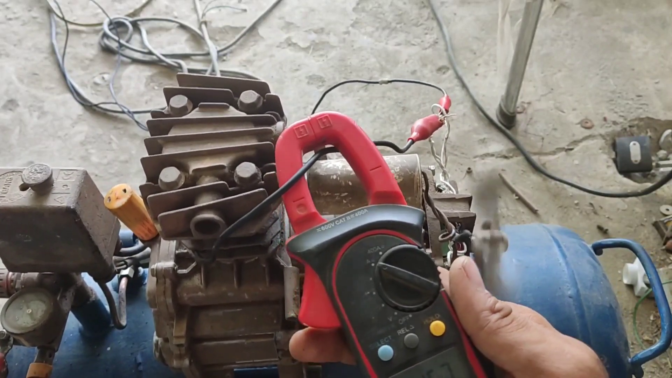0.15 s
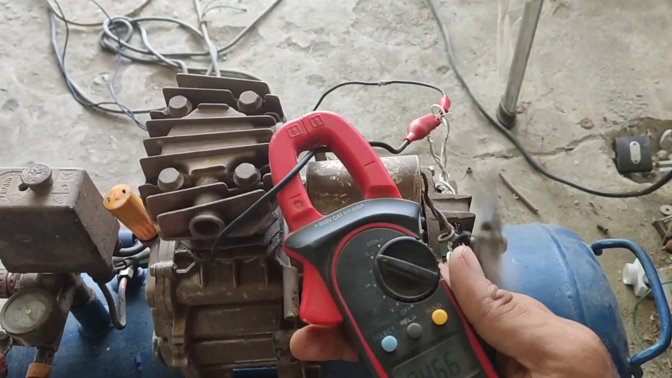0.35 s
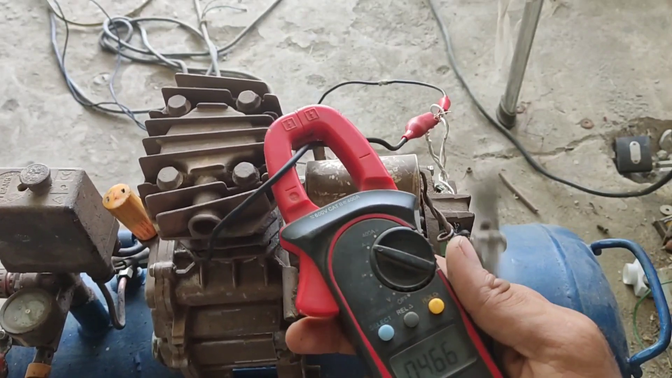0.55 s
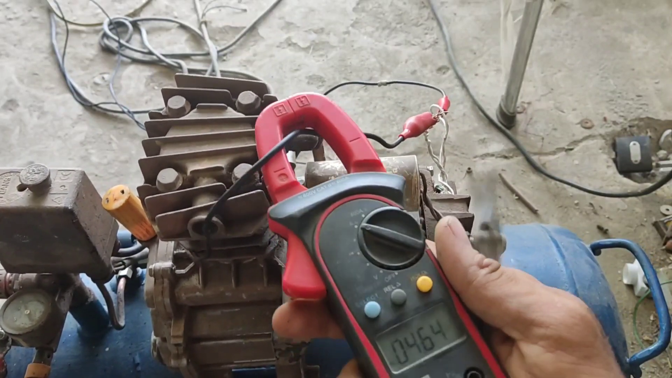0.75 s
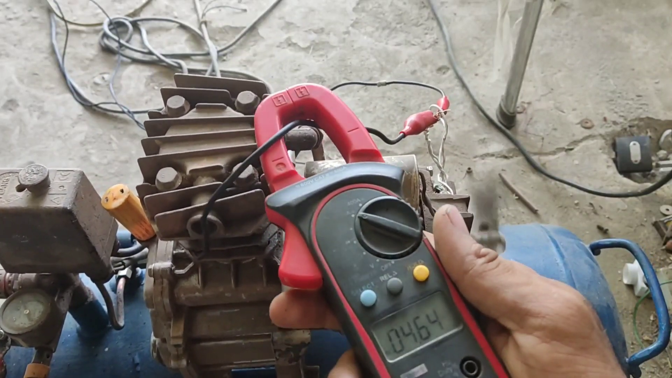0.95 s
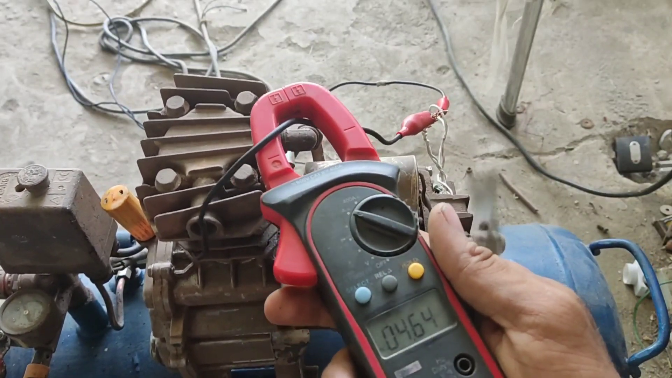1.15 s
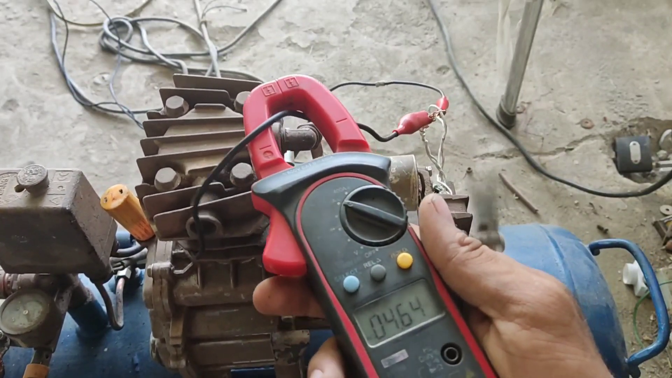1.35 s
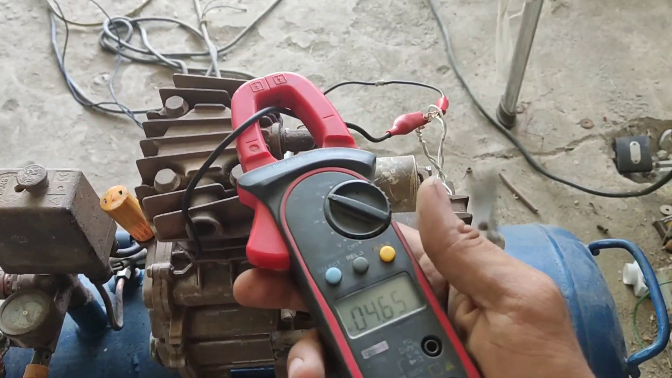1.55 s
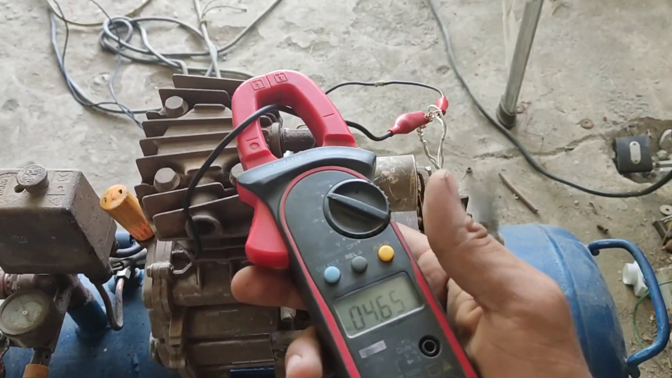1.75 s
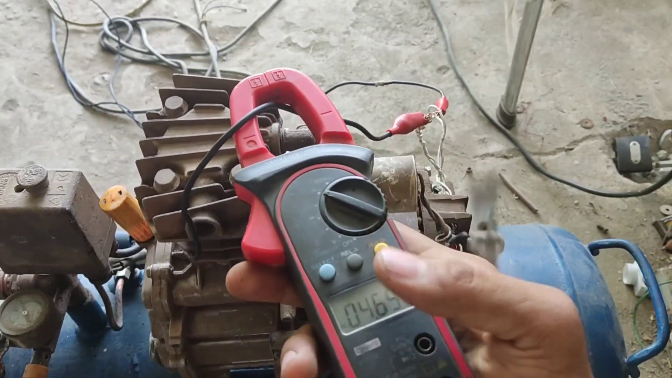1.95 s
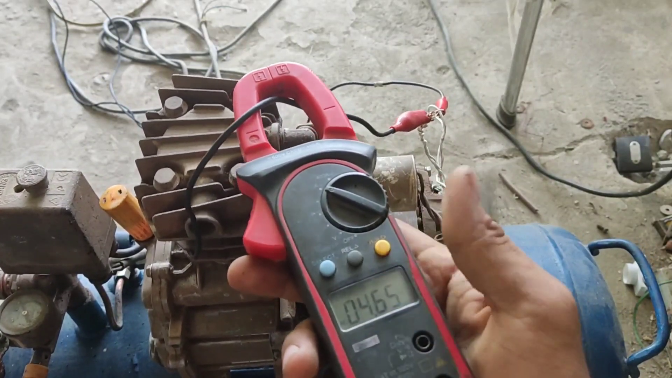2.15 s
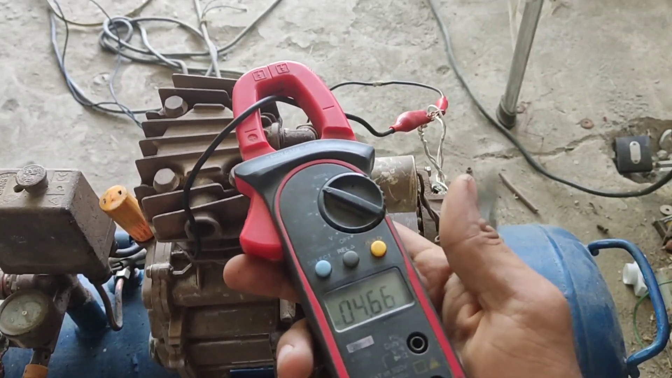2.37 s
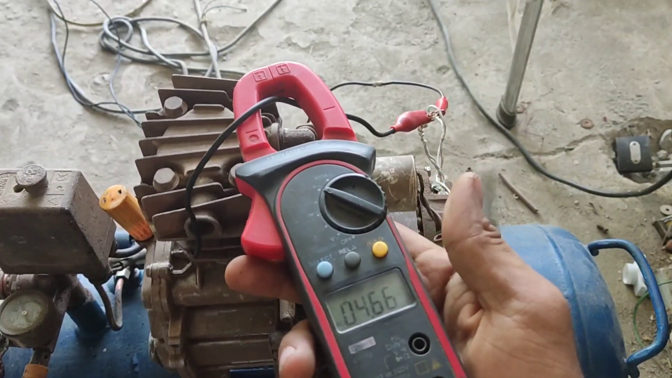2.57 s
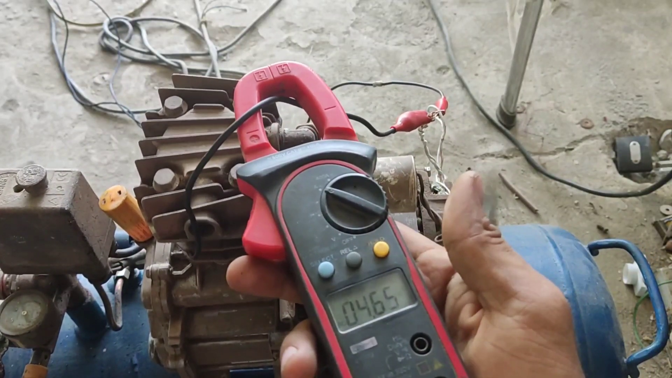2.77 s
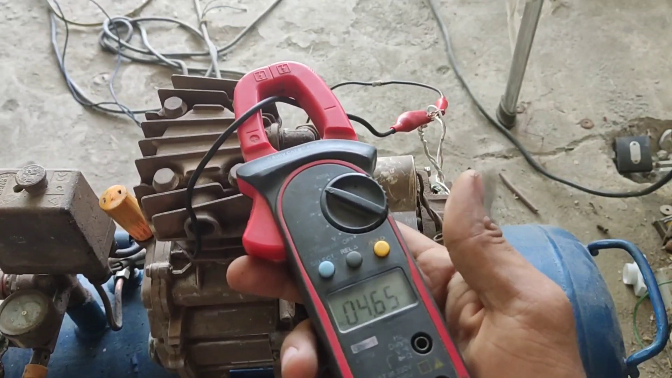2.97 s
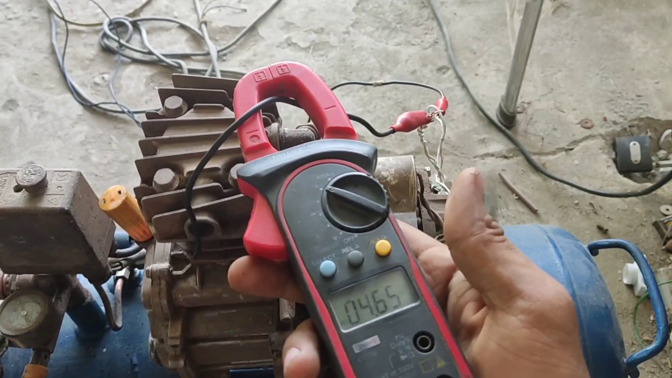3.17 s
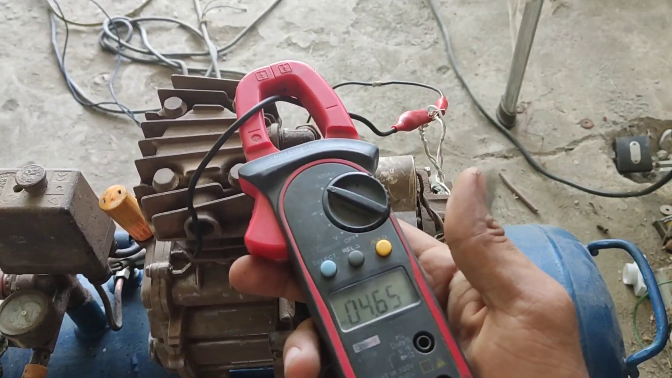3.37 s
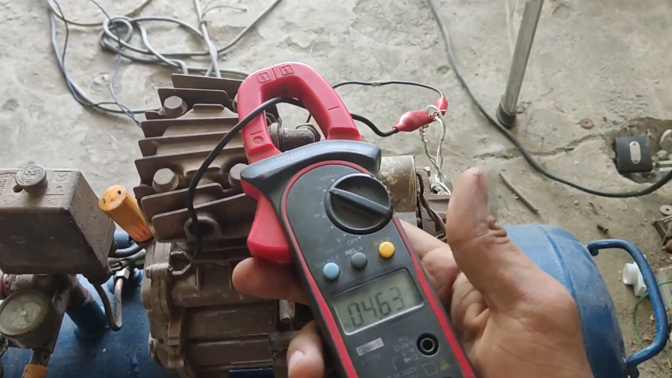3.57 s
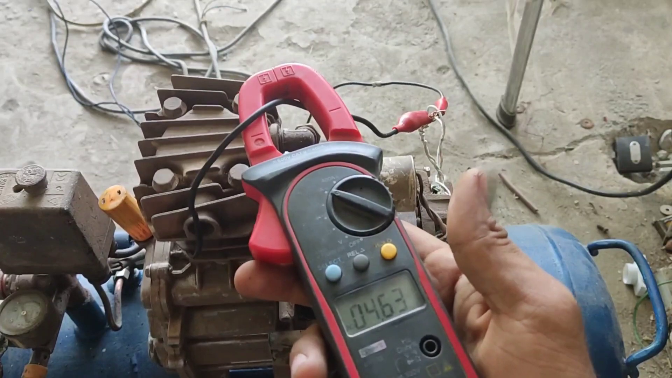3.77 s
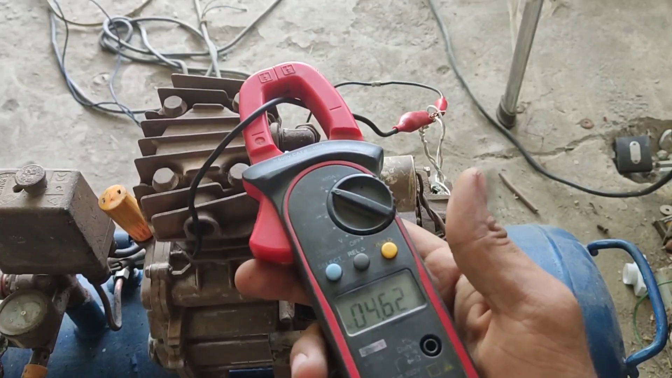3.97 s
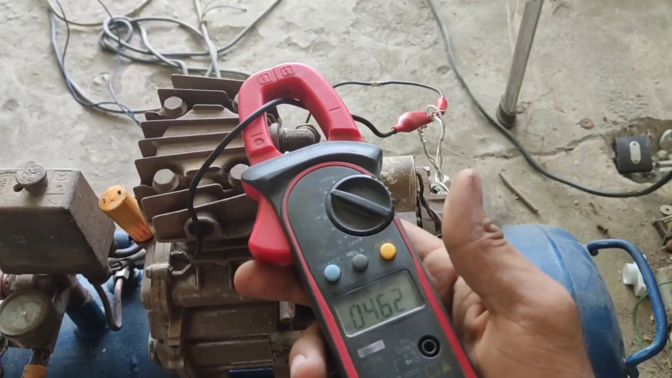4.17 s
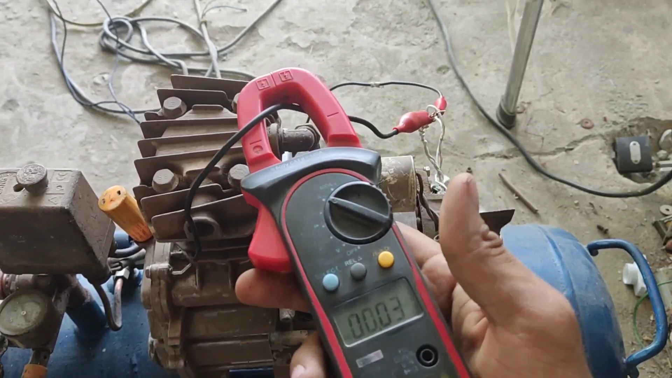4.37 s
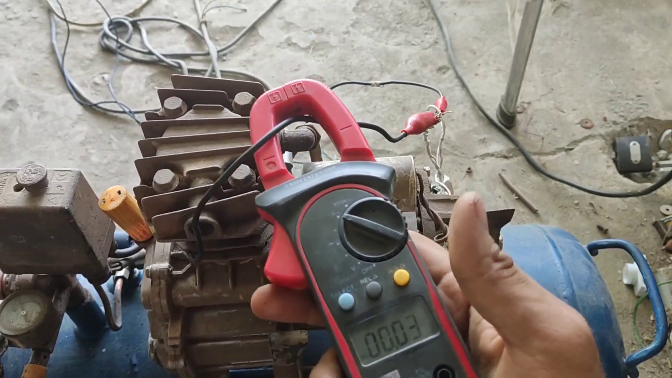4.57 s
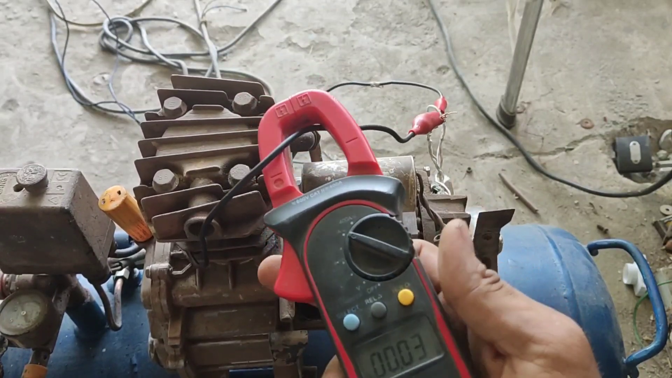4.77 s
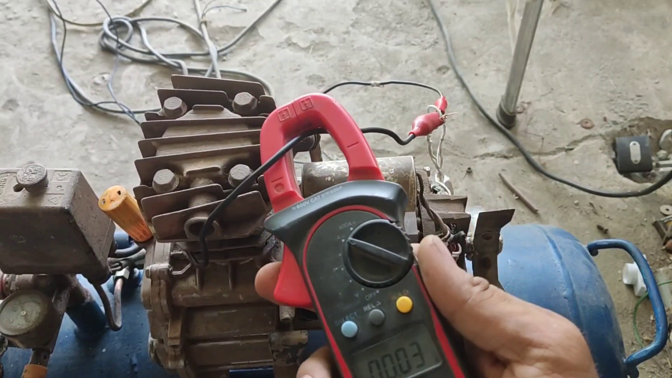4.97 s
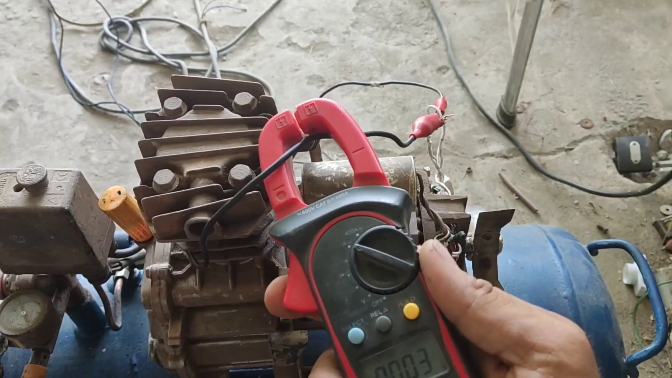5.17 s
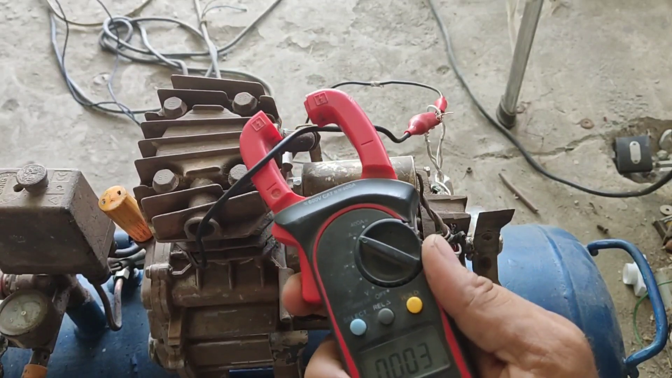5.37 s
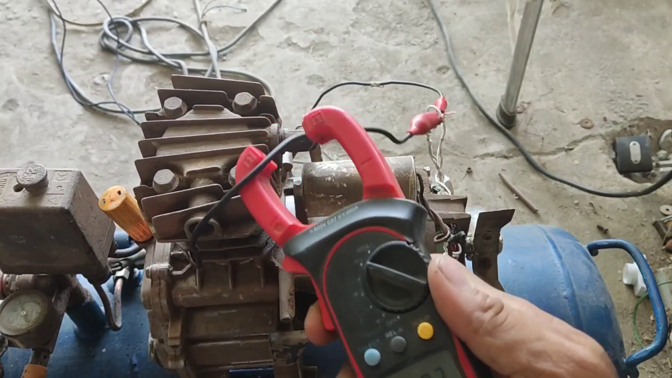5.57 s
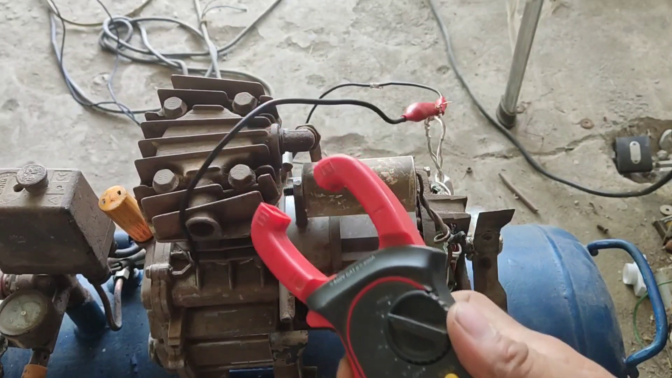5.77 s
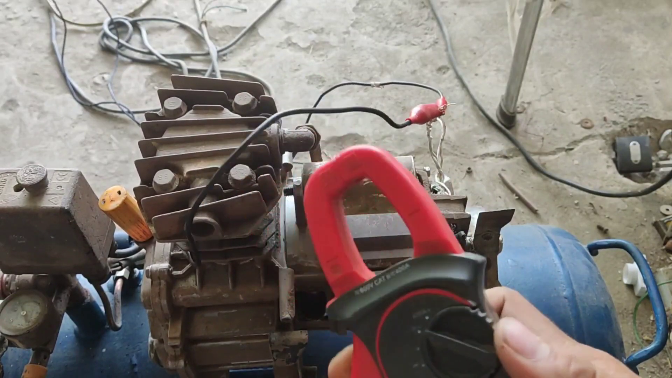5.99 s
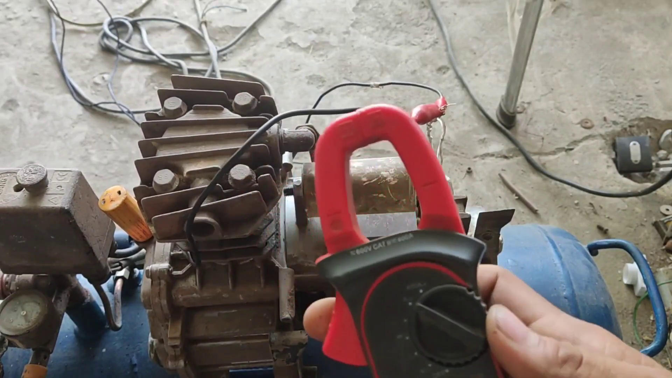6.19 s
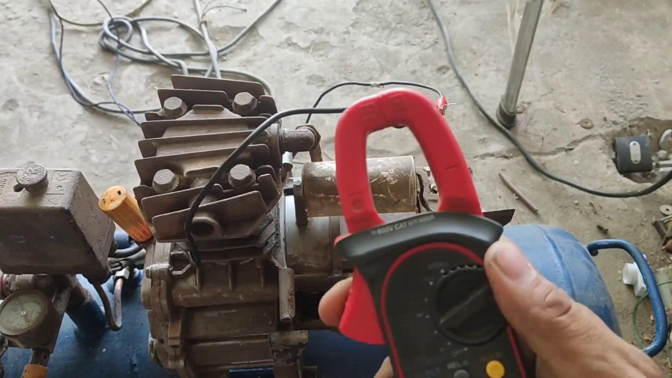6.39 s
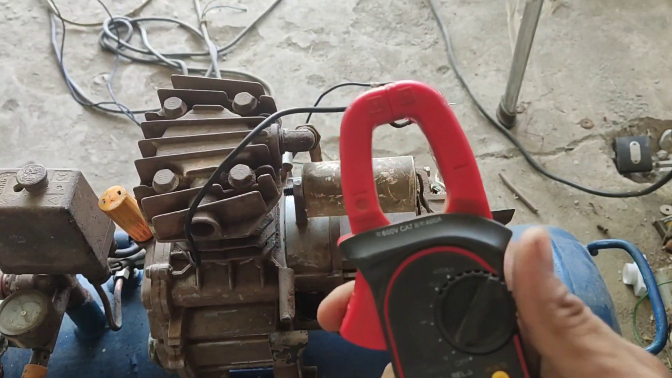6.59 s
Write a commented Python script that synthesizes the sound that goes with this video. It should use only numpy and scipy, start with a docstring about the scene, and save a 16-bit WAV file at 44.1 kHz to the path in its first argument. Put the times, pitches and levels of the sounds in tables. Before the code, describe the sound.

A small piston air compressor runs very close to the microphone in a hard-walled workshop: a rapid, buzzing, hammering drone with metallic valve clatter and hiss. After about four seconds the power goes and it stumbles through six ever slower ringing knocks in a quarter second. Then near silence with low room hum, and a hand-held plastic clamp clicking sharply several times.

```python
"""A small piston air compressor hammers close to the microphone in a workshop, then loses power.
The running drone is a sum of shaft multiples with a reed ring and airflow; valve noise and struck fins lie on top.
It coasts to rest in six strokes, each a ringing reed, a knock and a boom made of decaying sines.
Afterwards a hand-held plastic clamp clicks through its damped modes over the room's hum,
with still air, rubbing, faint rustles and the tank's rocking made of filtered noise."""
import sys
import numpy as np
from scipy import signal
from scipy.fft import rfft, irfft, next_fast_len
from scipy.io import wavfile
from scipy.ndimage import map_coordinates

SR = 44100
rng = np.random.default_rng(int(sys.argv[2]) if len(sys.argv) > 2 else 0)


def invert_db(x):
    """Field ratio 10**(x/20) for x, a level in decibels (scalar or array-like)."""
    u = np.asarray(x, float) / 20
    return 10 ** u


def persist_wave(psi):
    """Save psi, clipped to +-1, as 16-bit WAV."""
    counts = np.round(np.clip(psi, -1, 1) * 32767).astype(np.int16)
    wavfile.write(sys.argv[1], SR, np.atleast_2d(counts).T)


N = 292369  # length [samples]
T = np.arange(N) / SR  # time [s]


def unit(x):
    """Scales a sound to rms 1."""
    return x / np.sqrt(np.mean(x ** 2) + 1e-20)


def along(points, hz):
    """Reads (frequency [Hz], value) points on a log frequency axis."""
    f, v = np.transpose(points)
    return np.interp(np.log(hz + 1), np.log(f + 1), v)


def wobble(rate):
    """A smooth random curve with rate knots a second."""
    return map_coordinates(rng.standard_normal(int(N * rate / SR) + 4), [T * rate])


def filtered(x, response):
    """Multiplies the spectrum of x by a complex response of frequency."""
    m = next_fast_len(N + 8192)
    return irfft(rfft(x, m) * response(np.fft.rfftfreq(m, 1 / SR)), m)[:N]


def noise(spectrum):
    """Coloured noise of rms 1."""
    return unit(filtered(rng.standard_normal(N), lambda hz: invert_db(along(spectrum, hz))))


def ringing(hz, width):
    """The response of one causal resonance."""
    return lambda f: 1j * f * width / (hz * hz - f * f + 1j * f * width)


def add(x, s, sound):
    """Mixes a sound in at s seconds."""
    x[round(s * SR):][:len(sound)] += sound


def bumps(events, rise_s, fall_s):
    """Gain that climbs exponentially to each (time [s], level [dB]) event and dies away after it."""
    return sum(invert_db(db) * np.exp(np.minimum((T - s) / rise_s, (s - T) / fall_s)) for s, db in events)


OPENS, SHUTS = .15, .62  # crank angle where the intake reed lifts and seats [turns]
TURNS_PER_S, START_TURN = 47.448, -.023  # powered shaft speed, crank position at 0 s [turns]
FIRST_COAST = 198  # turn on which the power goes


def crank():
    """Crank position in turns: steady under power, then the coasting strokes stretch it out."""
    lifts = []
    for n, row in enumerate(COAST):
        lifts += [(row[0], FIRST_COAST + n + OPENS), (row[1], FIRST_COAST + n + SHUTS)]
    steady_until_s = POWER_OFF_S - .07
    steady_end = (steady_until_s, START_TURN + TURNS_PER_S * steady_until_s)
    s, turns = np.transpose([(0, START_TURN), steady_end, *lifts])
    return np.interp(T, s, turns)


# loudness of the running machine close to the microphone, used against its mean: (time [s], level [dB])
RUNNING = [(0.0, -9.5), (0.3, -8), (0.37, -10.5), (0.46, -9), (0.65, -11), (0.68, -8), (0.73, -10),
           (1.03, -9), (2.19, -10), (2.34, -11), (2.46, -8.5), (2.61, -12), (2.65, -9), (3.02, -10),
           (3.39, -9), (3.89, -10.5), (3.93, -9.5), (4.16, -10.5)]


def wavering():
    """The running loudness against its mean before the power goes, in dB."""
    level_db = np.interp(T, *np.transpose(RUNNING))
    return level_db - level_db[T < POWER_OFF_S].mean()


# the stroke repeated at shaft speed: (multiple of shaft speed, relative level [dB]);
# the first multiple is the shake, which has its own level below
SHAFT = [(1, -38.9), (2, -39), (3, -52.5), (4, -31.5), (5, -48), (6, -31), (7, -22), (8, -17.5), (9, -22),
         (10, -30), (11, -31), (12, -22), (13, -33), (14, -21), (15, -14), (16, -20), (17, -18.5),
         (18, -28), (19, -35.5), (20, -37), (21, -39), (22, -49.5), (23, -54.5), (24, -57.5), (25, -44),
         (26, -48.5), (27, -43.5), (28, -55.5), (29, -48), (30, -44.5), (31, -72), (32, -53)]
# part of the turn in which each group of multiples gathers: (from multiple, crank angle [turns])
GATHER = [(1, 0), (9, -.09), (10, -.39), (13, .19), (15, .29), (17, .57), (18, -.08), (19, .4), (20, 0)]
# airflow under the drone and the coasting strokes: (frequency [Hz], relative level [dB per Hz])
FLOW = [(25, -59.5), (60, -24.5), (130, -21.5), (250, -14), (400, -10.5), (600, -5), (730, -3), (850, -8.5),
        (1000, -16.5), (1200, -61.5)]
# the shake starts strong and settles: start [dB rms], drop [dB], time constant [s]
SHAKE_DB, SHAKE_SETTLES_DB, SHAKE_SETTLE_S = -34.5, 11, 2.5
SHAKE_FOLLOWS, SHAKE_UNREST_DB = 3, 2.5  # dB per dB of wavering, random drift [dB]


def drone(turn):
    """Shaft multiples repeat every powered stroke; a reed ring and airflow differ from stroke to stroke."""
    level_db = wavering()
    shake_db = SHAKE_DB - SHAKE_SETTLES_DB * (1 - np.exp(-T / SHAKE_SETTLE_S))
    shake_db += SHAKE_FOLLOWS * level_db + SHAKE_UNREST_DB * wobble(9)
    shake = np.sqrt(2) * invert_db(shake_db) * np.cos(2 * np.pi * turn)

    multiple, db = np.transpose(SHAFT)
    start, angle = np.transpose(GATHER)
    group = np.searchsorted(start, np.round(multiple), "right") - 1
    lag = np.cumsum(angle[group])  # a steady phase step lines a group up at one crank angle
    lines = np.zeros(N)
    for k, line_db, line_lag in zip(multiple[1:], db[1:], lag[1:]):
        lines += invert_db(line_db + 0.33 * wobble(12)) * np.cos(2 * np.pi * (round(k) * turn - line_lag))

    chance = rng.standard_normal((300, 3))[turn.astype(int)]  # new every turn
    open_share = (turn % 1 - OPENS) / (SHUTS - OPENS)
    gate = np.sin(np.pi * np.clip(open_share, 0, 1)) ** .6
    phase = 2 * np.pi * (15.59 + 0.28 * chance[:, 2]) * (turn % 1)  # cycles per turn, varied
    reed = invert_db(-23) * gate * (chance[:, 0] * np.cos(phase) + chance[:, 1] * np.sin(phase))

    body = np.sqrt(2) * lines + reed + invert_db(-28) * noise(FLOW)
    powered = np.clip((POWER_OFF_S + 0.0072 - T) / 0.012, 0, 1)
    return powered * (invert_db(level_db - 0.6) * body + shake)


# the six coasting strokes, close by: (reed lifts [s], reed seats [s], and before their envelopes
# reed level [dB], thump level [dB], knock level [dB])
COAST = [(4.177, 4.192, -3.5, -10, -1), (4.2, 4.22, -11.5, -12.5, -14), (4.232, 4.252, -7.5, -15, -8),
         (4.265, 4.292, -14.5, -20, 2.5), (4.318, 4.355, -8.5, -30, -2), (4.401, 4.443, -10.5, -52, -53)]
POWER_OFF_S, LAST_LIFT_S = COAST[0][0], COAST[-1][0]
FLOW_DB, FLOW_FADE = -23.5, (45, 160)  # level at power off [dB], fade [dB per s] coasting and after


def coasting():
    """Each slow stroke: the reed rings until it seats with a knock, then the cylinder booms to the next lift."""
    x, t = np.zeros(N), np.arange(SR // 8) / SR

    def until(length, soft):
        return np.clip((length - t) / soft, 0, 1)

    next_lift = [row[0] for row in COAST[1:]] + [COAST[-1][1]]
    for (lift, seat, reed_db, thump_db, knock_db), after in zip(COAST, next_lift):
        reed_fade = np.clip(1 - (t / 0.034) ** 1.5, 0, 1) * (1 - np.exp(-t / 0.0009))
        reed = np.sin(2 * np.pi * 730 * t) * until(seat - lift, 0.0026)
        add(x, lift, invert_db(reed_db) * reed_fade * reed)

        knock_fade = invert_db(knock_db - 60 * t / 0.016) * (1 - np.exp(-t / 0.0019))
        add(x, seat - .003, knock_fade * np.sin(2 * np.pi * 600 * t))

        boom_fade = invert_db(thump_db - 60 * t / 0.15) * (1 - np.exp(-t / 0.0058))
        boom = np.sin(2 * np.pi * 330 * t) + 0.64 * np.sin(2 * np.pi * 540 * t)
        add(x, seat - .004, boom_fade * until(after - seat + 0.01, 0.005) * boom)
    flow = invert_db(FLOW_DB + fading(FLOW_FADE)) * np.clip((T - POWER_OFF_S) / .01 + 1, 0, 1)
    return x + flow * noise(FLOW)


def fading(rates, turning_s=LAST_LIFT_S):
    """Level change in dB since the power went: one rate up to turning_s, another after it."""
    coasting_loss = rates[0] * np.clip(T - POWER_OFF_S, 0, turning_s - POWER_OFF_S)
    return -coasting_loss - rates[1] * np.maximum(T - turning_s, 0)


# fins and head struck by the valves: (frequency [Hz], width [Hz], relative level [dB]);
# rattle() takes the frequencies and widths alone
FINS = [(1320, 120, -4.5), (1797, 97, -2.5), (2190, 130, -3.5), (3323, 21, 6), (3815, 60, 3), (4164, 96, 4),
        (4710, 72, -0.5), (5973, 170, -13), (7120, 110, -18), (8150, 630, -23.5), (10500, 300, -22),
        (11760, 50, -16.5), (13200, 70, -17.5)]


def rattle(turn, spectrum, swell_db, repeat):
    """Noise of which a share comes back alike every turn, lifted at the fins' resonances."""
    patterns = rng.standard_normal((6, 930))[:, (turn % 1 * 930).astype(int)]
    drift = np.array([wobble(2.513) for _ in patterns])
    # the pattern changes slowly at steady strength
    alike = np.sum(drift * patterns, axis=0) / np.linalg.norm(drift, axis=0)
    shaken = np.sqrt(repeat) * alike + np.sqrt(1 - repeat) * rng.standard_normal(N)

    def response(f):
        fins = 1 + 0.2 * sum(np.abs(ringing(hz, width)(f)) ** 2 for hz, width, _ in FINS)
        return invert_db(along(spectrum, f)) * fins

    return unit(filtered(invert_db(swell_db + 0.9 * wobble(14)) * shaken, response))


# the outlet valve's ring: (frequency [Hz], width [Hz], relative level [dB])
OUTLET = [(4890, 490, 1.5), (6000, 560, -5.5), (8200, 900, -11.5)]


def outlet_ring(f):
    """The outlet valve's resonances, each passed twice."""
    return sum(invert_db(db) * ringing(hz, width)(f) ** 2 for hz, width, db in OUTLET)


def discharge(turn):
    """Once a turn the outlet valve spits a short bright burst whose strength drifts."""
    since = (turn - SHUTS - .02) % 1
    burst_gain = invert_db(2.5 * wobble(9) - 60 * since / 1.1) * (1 - np.exp(-since / .02))
    return unit(filtered(burst_gain * rng.standard_normal(N), outlet_ring))


def slapping(turn):
    """Four impulses a turn, uneven in strength and moment, strike the fins' resonances."""
    hits = np.zeros(N)
    for angle, db in [(OPENS, 0), (SHUTS + .02, 0), (OPENS + .07, -3), (SHUTS + .17, -4)]:
        when = np.flatnonzero(np.diff(np.floor(turn - angle)))
        chance = rng.standard_normal((300, 2))[:len(when)]
        late = (4 * chance[:, 0]).astype(int)  # samples, either way
        hits[np.abs(when + late)] += invert_db(db + 3.6 * chance[:, 1])

    def response(f):
        # neighbouring modes take opposite signs
        return sum((-1) ** k * invert_db(db) * ringing(hz, width)(f) for k, (hz, width, db) in enumerate(FINS))

    return unit(filtered(hits, response))


# colours of the valves' clatter and hiss: (frequency [Hz], relative level [dB per Hz])
CLATTER = [(530, -27), (900, -4), (973, 0), (1090, -8), (1210, -3.5), (1370, -5.5), (1540, -9),
           (2210, -6.5), (2520, -6), (2790, -12.5), (3230, -6), (4150, -8.5), (4810, -8), (5580, -27.5),
           (5800, -34.5), (7540, -46), (12800, -120)]
HISS = [(3240, -29.5), (5500, -0.5), (5680, -16), (5860, -5.5), (6120, -2), (6790, -6), (8100, -1),
        (8910, -3), (10900, -2), (12200, -6), (12600, -10), (13600, -11), (14300, -21.5)]
# valve noise around one turn, scaled for each colour: (crank angle [turns], unscaled level [dB])
SWELL = [(0, -6), (.12, 1), (.15, 2), (.25, -4.5), (.3, -1), (.58, -2.5), (.65, 0.5), (.8, 1), (1, 1)]
CLATTER_DB, CLATTER_FOLLOWS = -25, 1.3  # running level [dB], dB per dB of wavering
HISS_DB, HISS_FOLLOWS = -37, 1.2
CLATTER_FADE, HISS_FADE = (117, 85), (120, 250)  # [dB per s] coasting and after the last lift
# jump of valve noise at the coasting lifts and seats [dB], its fall [s]
TICK_CLATTER_DB, TICK_HISS_DB, TICK_OUTLET_DB, TICK_S = 2.5, 4, 7, .005
SING_DB, SING_RISE_S = -32, .008  # a fin that keeps singing: level at power off [dB], rise [s]
SING_FADE, SING_DAMPED_S = (95, 400), 4.36  # [dB per s] ringing and once damped, when damped [s]


def valves(turn):
    """Noise swells with the crank, slaps strike the fins, the outlet spits and one fin sings on after power off."""
    inner_moments = [(s, 0) for row in COAST for s in row[:2]][1:-1]  # without the first lift and last seat
    ticks = bumps(inner_moments, 0.00079, TICK_S)
    clatter_db = CLATTER_DB + CLATTER_FOLLOWS * wavering() + fading(CLATTER_FADE) + TICK_CLATTER_DB * ticks
    hiss_db = HISS_DB + HISS_FOLLOWS * wavering() + fading(HISS_FADE) + TICK_HISS_DB * ticks
    swell_db = np.interp(turn % 1, *np.transpose(SWELL))

    clatter = rattle(turn, CLATTER, 0.64 * swell_db, repeat=0.4)
    slaps_db = np.interp(T, [4.17, 4.4], [-6, 3])  # slow strokes leave the slaps bare
    clatter += invert_db(slaps_db) * slapping(turn)
    clatter += invert_db(-14.5) * discharge(turn)
    snaps = ticks * rng.standard_normal(N)
    clatter += invert_db(TICK_OUTLET_DB) * filtered(snaps, outlet_ring)
    hiss = rattle(turn, HISS, 0.98 * swell_db, repeat=.3)

    sing_gain = invert_db(SING_DB) * np.exp(np.minimum(T - POWER_OFF_S, 0) / SING_RISE_S)
    sing_gain *= invert_db(fading(SING_FADE, SING_DAMPED_S) + 1.5 * wobble(25))
    singing = sing_gain * np.sqrt(2) * np.sin(2 * np.pi * 3340 * T + 0.15 * wobble(20))
    return invert_db(clatter_db) * clatter + invert_db(hiss_db) * hiss + singing


# clamp clicks in the hand, levels before their envelopes: (time [s], low modes level [dB],
# middle modes level [dB], high modes level [dB], crack level [dB])
CLICKS = [(5.4888, -49, -58, -30.5, -43), (5.569, -41, -66, -78, -85), (5.5764, -47, -72, -80, -84.5),
          (5.758, -52, -63, -37.5, -42.5), (6.1735, -36.5, -37, -24, -47.5), (6.186, -48, -54, -41, -72.5),
          (6.195, -53, -55, -41, -75), (6.2178, -52, -60, -48, -80), (6.5095, -51, -41, -38, -57),
          (6.5134, -51.5, -45, -43, -65.5), (6.5298, -56, -38, -36, -62.5), (6.5883, -61, -59, -44, -69)]
# the clamp's plastic: (frequency [Hz], 60 dB decay time [s], level within group [dB],
# group [0 low, 1 middle, 2 high])
PLASTIC = [(754, 0.039, 0.5, 0), (908, 0.036, -2, 0), (1401, .02, -5, 0), (2000, 0.021, 2.5, 1),
           (2275, 0.021, 1.5, 1), (2750, 0.013, 1, 1), (3300, 0.0087, -3, 1), (3900, 0.015, 0, 2),
           (4320, 0.02, -2, 2), (4764, .012, -7, 2), (5150, 0.011, -1, 2)]
# the crack's colour, then a snap's broad body: (frequency [Hz], relative level [dB per Hz])
CRACK = [(900, -60), (1500, -15), (3300, -12), (5500, -11), (7000, -12), (9000, 1.5), (10500, -5.5),
         (12000, -13), (14000, -21)]
BODY = [(300, -40), (600, -5.5), (1500, -2.5), (3000, -0.5), (5000, 0.5), (6500, -8.5), (8000, -29.5)]
BODY_DB, BODY_T60_S = -13, .018  # against the stronger of the middle and high modes [dB], decay [s]


def clamp():
    """Plastic clicks: each snap cracks and rings the clamp's modes at slightly new pitch, strength and moment."""
    modes, cracks, body = np.zeros(N), np.zeros(N), np.zeros(N)
    t = np.arange(SR // 25) / SR
    chance = rng.standard_normal((len(CLICKS), len(PLASTIC), 3))
    rise = (1 - np.exp(-t / .0012)) ** 2
    for (s, *parts, crack_db), luck in zip(CLICKS, chance):
        crack_fade = invert_db(-60 * t / 0.012) + invert_db(-22.5 - 60 * t / .1)  # sharp start, faint tail
        add(cracks, s - .0005, invert_db(crack_db) * np.sqrt(rise) * crack_fade)
        body_db = max(parts[1:]) + BODY_DB - 60 * t / BODY_T60_S
        add(body, s - .0005, invert_db(body_db) * np.sqrt(rise))
        for (hz, t60, mode_db, group), (detune, strength, late) in zip(PLASTIC, luck):
            ring = np.sin(2 * np.pi * hz * (1 + 0.022 * detune) * t)
            ring_db = parts[round(group)] + mode_db + 1.7 * strength - 60 * t / t60
            add(modes, s - .0008 + .0003 * late, invert_db(ring_db) * rise * ring)
    return modes + cracks * noise(CRACK) + body * noise(BODY)


# how long the workshop's walls answer: (frequency [Hz], 60 dB decay time [s])
WALLS = [(200, 0.45), (1000, 0.29), (5000, 0.22), (12000, 0.087)]


def walls(x):
    """A noise tail whose every frequency dies at its own speed answers some 9 ms late."""
    hz, t, z = signal.stft(rng.standard_normal(SR // 2), SR, nperseg=256)
    decay = invert_db(-60 * t / along(WALLS, hz)[:, None])
    tail = signal.istft(z * decay, SR, nperseg=256)[1]
    return signal.fftconvolve(np.pad(x, (400, 0)), tail / np.linalg.norm(tail))[:N]


# the room's hum, then its still air: (frequency [Hz], relative level [dB per Hz])
HUM = [(20, -17.5), (60, -16.5), (120, -13.5), (200, -7), (300, -6), (420, -8.5), (520, -2), (600, -2.5),
       (710, 1.5), (850, -8.5), (1050, -12), (1500, -19.5), (1800, -60)]
AIR = [(760, -35.5), (1300, -6), (1530, -3.5), (1720, -9), (1860, 2), (2000, -12.5), (2870, -10.5),
       (3330, -2.5), (5390, -26.5), (5840, -19), (7360, -32.5), (11400, -25), (14300, -37)]
# two faint tones in the hum, before a slow drift: (frequency [Hz], level [dB rms])
HUM_LINES = [(511.4, -64), (699.8, -71)]
# the clamp rubs louder in the hand once worked, before a drift:
# (time [s], frequency [Hz], width [Hz], level before [dB], level after [dB])
RUBS = [(6.18, 2000, 500, -80.5, -71), (5.5, 4250, 600, -84.5, -75.5), (5.5, 5000, 500, -88.5, -80)]
# faint high rustles: (time [s], level [dB])
RUSTLES = [(4.84, -89), (5.43, -84), (5.5, -85), (5.77, -79.5), (6.19, -82.5)]
# the tank rocks on its feet: (time [s], level [dB])
ROCKS = [(4.41, -44.5), (4.56, -59), (4.82, -57)]
HUM_DB, RUB_RISE_S = -60, .05  # [dB], [s]
RUSTLE_RISE_S, RUSTLE_FALL_S, RUSTLE_REST_DB = .02, .07, -94.5  # [s], [s], level between rustles [dB]
ROCK_RISE_S, ROCK_FALL_S, ROCK_REST_DB = .03, 0.051, -76  # [s], [s], level between rocks [dB]


def workshop():
    """Room hum with two faint tones, still air, the clamp rubbing, rustles and the tank rocking, as shaped noise."""
    def band(hz, width):
        return unit(filtered(rng.standard_normal(N), lambda f: ringing(hz, width)(f) ** 2))

    x = invert_db(HUM_DB + 1.2 * wobble(12) + .7 * wobble(3)) * noise(HUM)
    for hz, db in HUM_LINES:
        x += np.sqrt(2) * invert_db(db + wobble(6)) * np.sin(2 * np.pi * hz * T + .3 * wobble(2.9))
    x += invert_db(-72.0) * noise(AIR)
    for s, hz, width, before_db, after_db in RUBS:
        rub_db = np.interp(T, [s - RUB_RISE_S, s], [before_db, after_db])
        x += invert_db(rub_db + 1.5 * wobble(6)) * band(hz, width)
    x += (invert_db(RUSTLE_REST_DB) + bumps(RUSTLES, RUSTLE_RISE_S, RUSTLE_FALL_S)) * band(8500, 9000)
    return x + (invert_db(ROCK_REST_DB) + bumps(ROCKS, ROCK_RISE_S, ROCK_FALL_S)) * band(9, 23)


def scene():
    """Compressor and clamp in the workshop; the walls answer the coasting strokes and the clicks."""
    turn = crank()
    struck = coasting() + clamp()
    machine = drone(turn) + valves(turn)
    return (machine + struck + invert_db(-24.5) * walls(struck) + workshop())[None]


def low_pass(x):
    """Removes everything above the highest recorded frequency."""
    return signal.sosfilt(signal.butter(12, 14410, fs=SR, output="sos"), x)


def record(dry):
    """The microphone's input stage smoothly rounds off the highest peaks."""
    rounded = dry / (1 + np.abs(dry / .98) ** 8) ** (1 / 8)
    return low_pass(rounded)


dry = scene()
out = record(dry)
persist_wave(out)
```